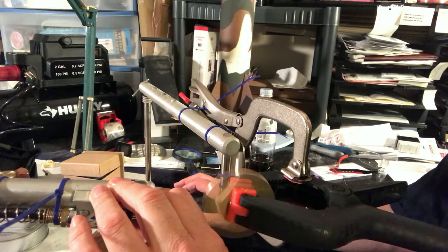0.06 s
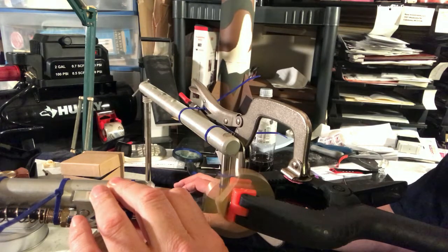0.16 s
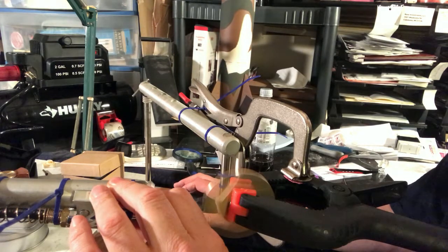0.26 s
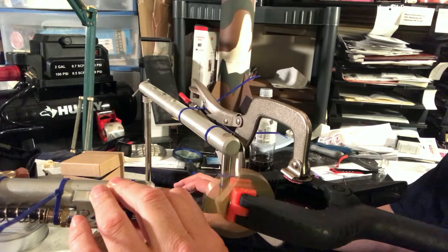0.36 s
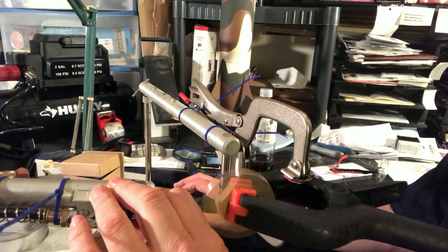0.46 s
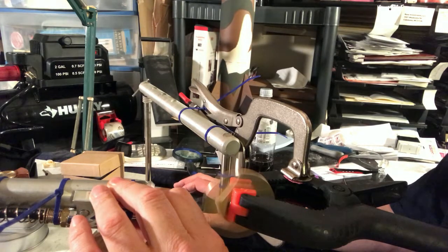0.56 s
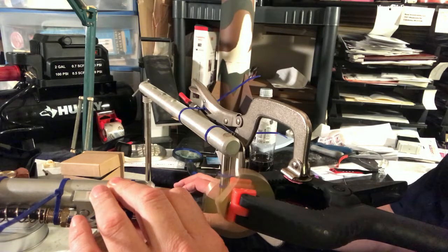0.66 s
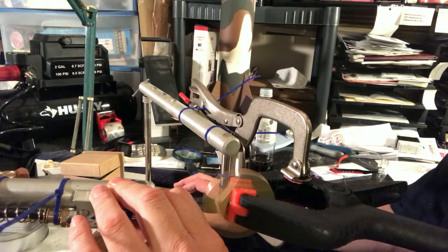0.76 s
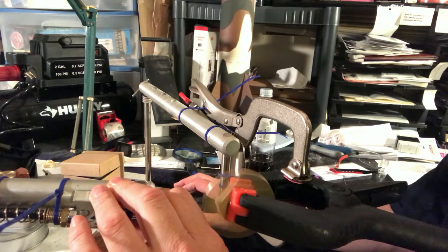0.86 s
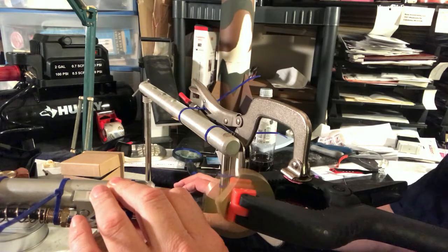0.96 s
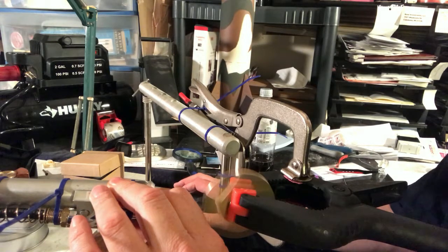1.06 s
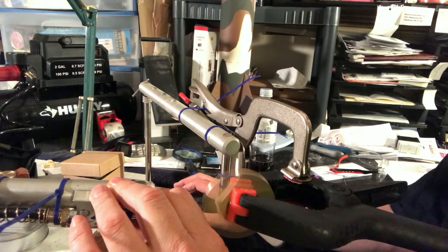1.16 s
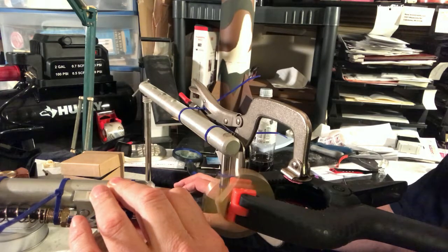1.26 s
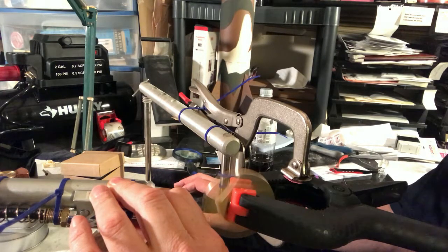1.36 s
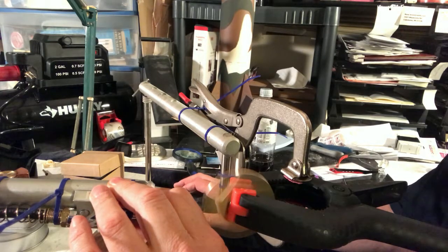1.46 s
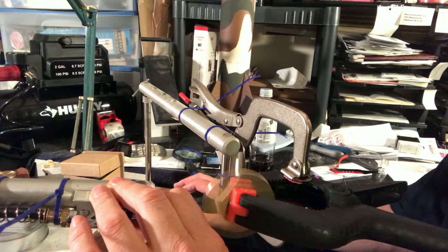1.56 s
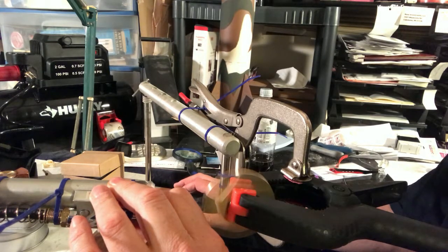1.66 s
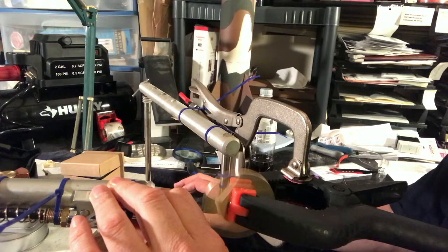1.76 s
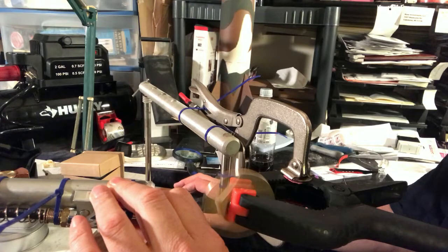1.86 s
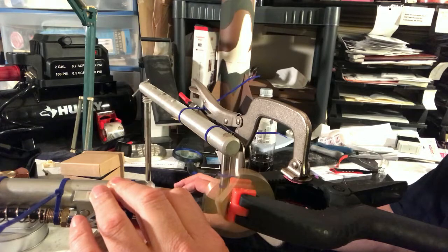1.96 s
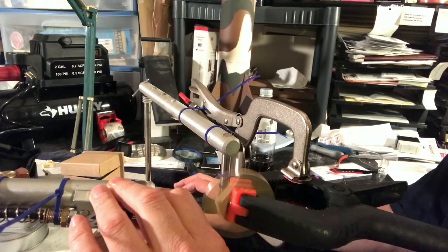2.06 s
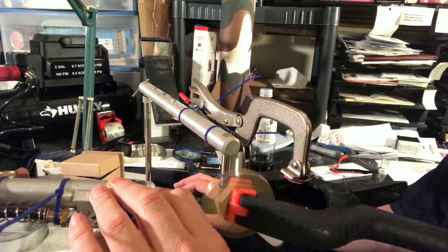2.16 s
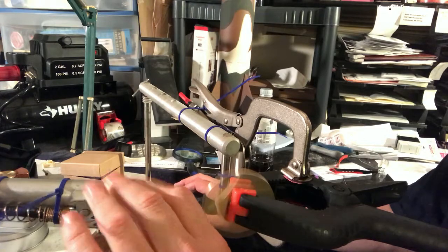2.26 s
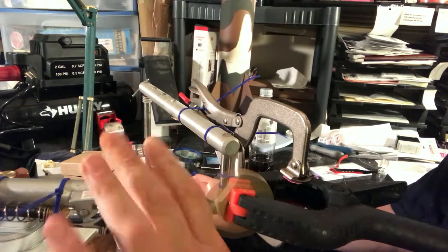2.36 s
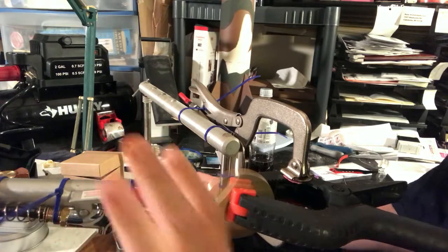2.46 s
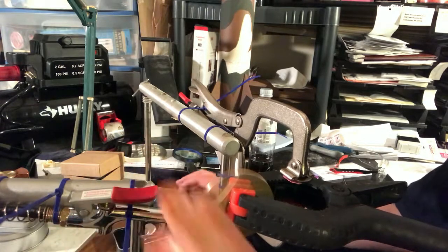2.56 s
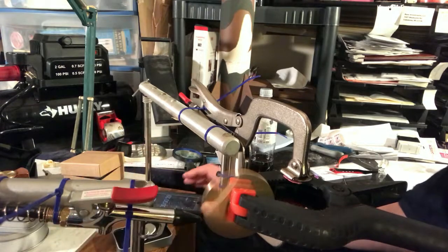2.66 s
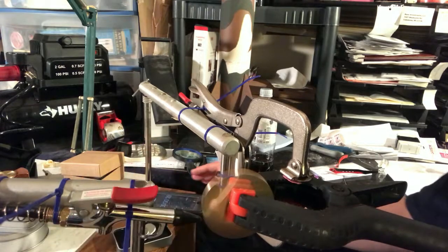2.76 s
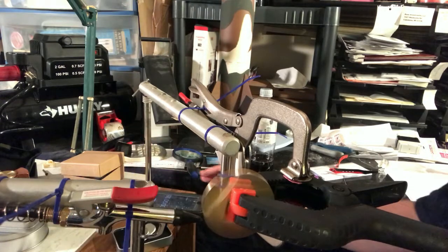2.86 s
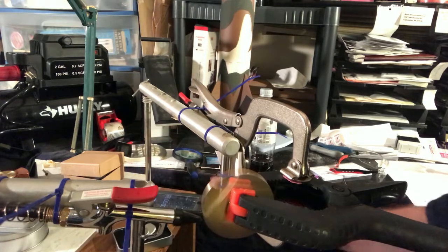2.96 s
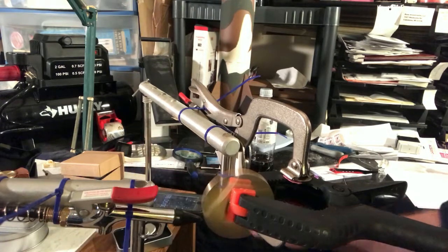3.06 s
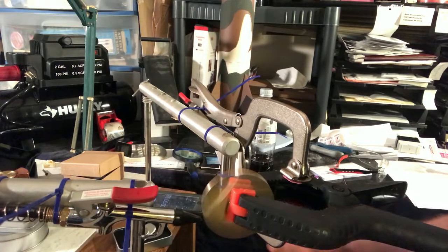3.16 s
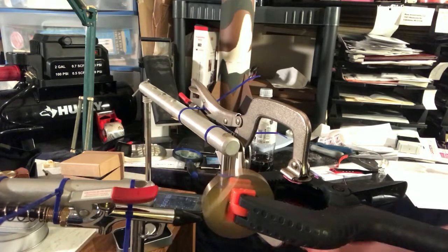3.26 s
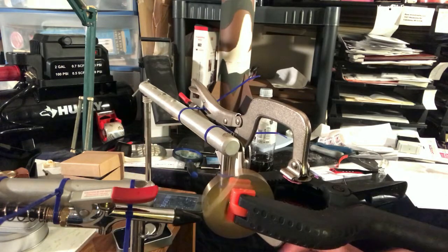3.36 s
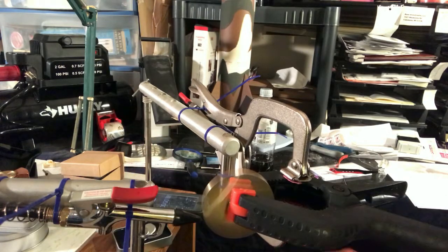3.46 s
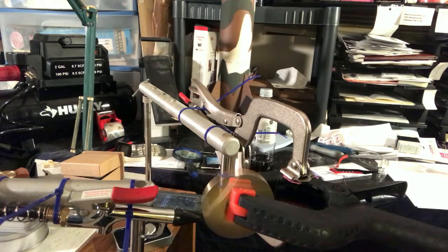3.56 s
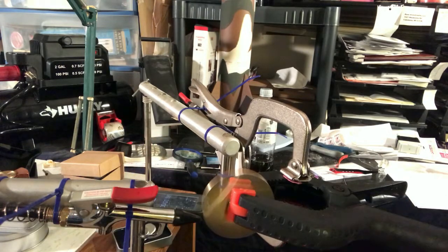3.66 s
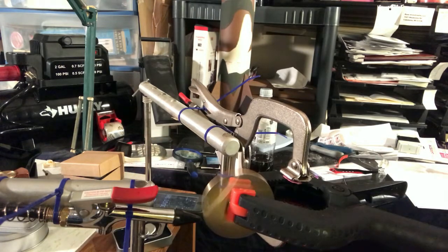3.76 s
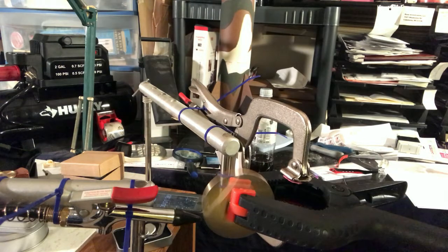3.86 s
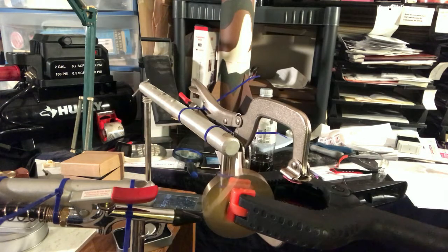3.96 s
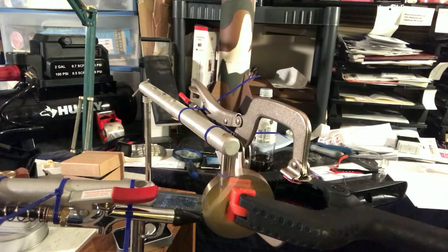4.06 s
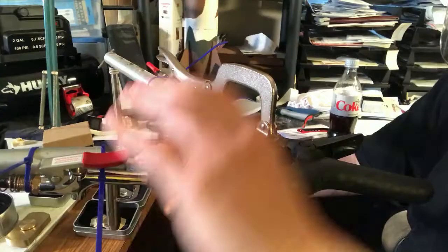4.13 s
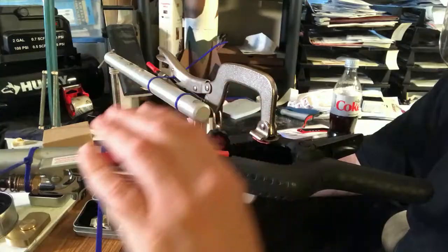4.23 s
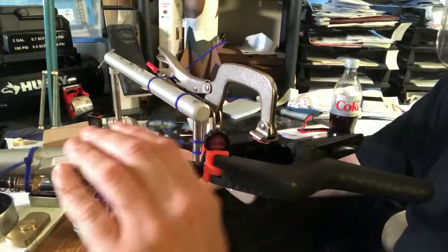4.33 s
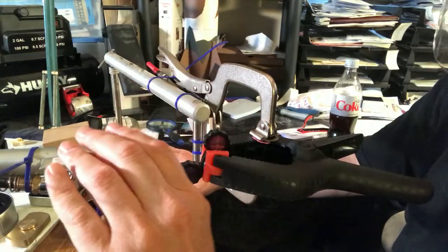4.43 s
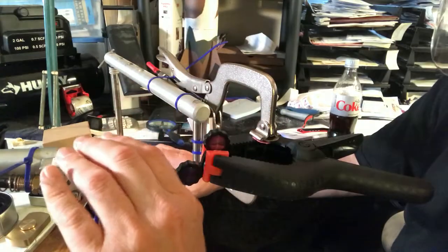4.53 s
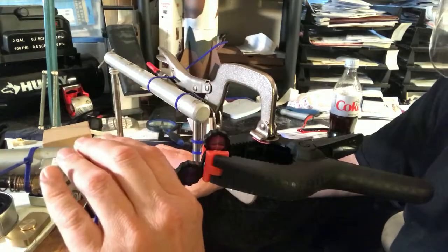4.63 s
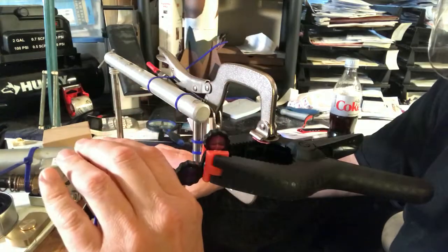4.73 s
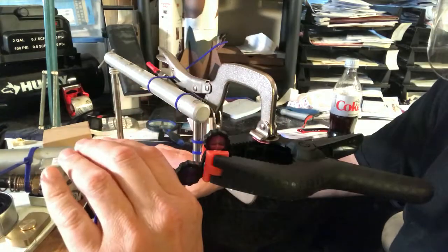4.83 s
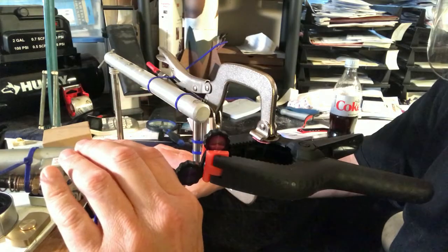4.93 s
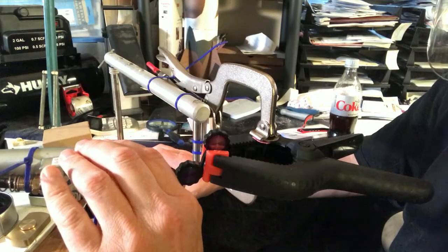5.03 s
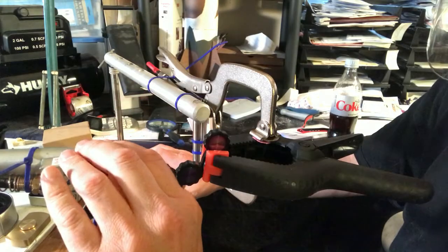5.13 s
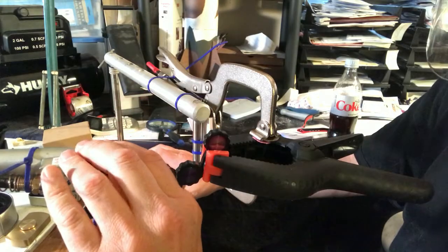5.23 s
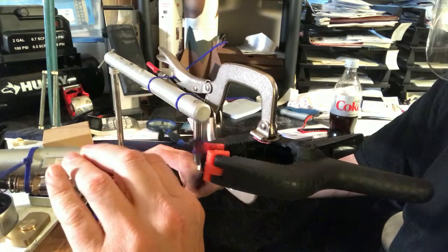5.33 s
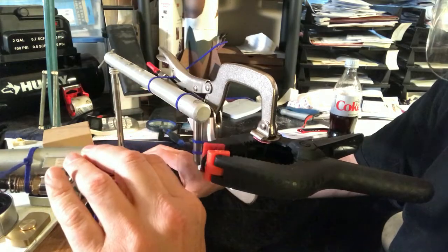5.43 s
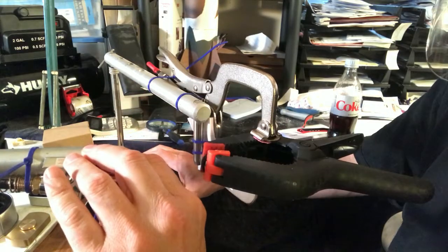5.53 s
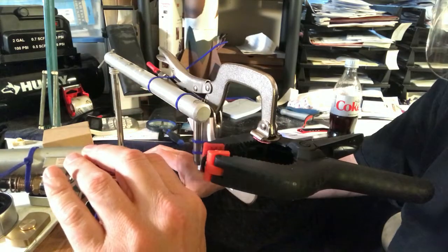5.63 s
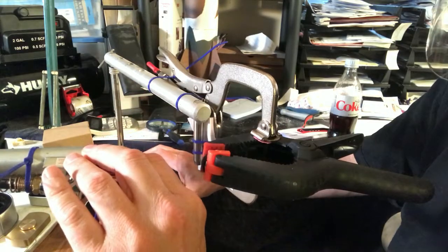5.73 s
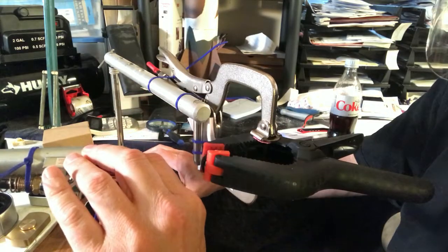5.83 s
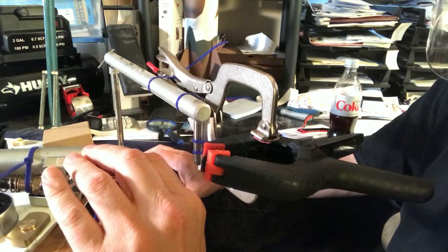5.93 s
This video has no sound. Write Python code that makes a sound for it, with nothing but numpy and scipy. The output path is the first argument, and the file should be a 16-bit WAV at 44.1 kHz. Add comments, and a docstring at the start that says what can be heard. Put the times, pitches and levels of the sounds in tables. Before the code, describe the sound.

From the start, a blow gun hisses loudly and steadily onto a small brass spinner, close to the microphone in a workshop. The spinner chops the jet into a buzz that rises slowly in pitch. At about 2.4 seconds the air shuts off sharply and the spinner coasts much more quietly, with a fast metallic rattle from its loose bearing and a low hum that gradually grows. From about 2.8 seconds a faint, very high squeal comes and goes, along with a few sharper ticks. At about 4.2 seconds the coasting cuts off abruptly, leaving only very faint room noise and hum. At about 5.4 seconds the jet bursts on again, slightly louder, with a few short low thuds of air hitting the microphone. The hiss flutters faster and faster as the spinner starts turning from rest, continuing to the end at around 6 seconds.

```python
"""Blow gun and brass spinner.

Close by on a workshop bench, in mono, a small rotor chops an air jet into a rising buzz.
The air stops and the rotor coasts, rattling, humming and squealing in its loose bearing.
After an abrupt break it stands still in the quiet room, until the jet starts it again from rest."""
import sys
import numpy as np
from scipy import signal
from scipy.fft import rfft, irfft, next_fast_len
from scipy.io import wavfile

SR = 44100
rng = np.random.default_rng(int(sys.argv[2]) if len(sys.argv) > 2 else 0)


def transcribe(signal):
    """Save signal, clipped to [-1, 1], as a 16-bit WAV file at the path in sys.argv[1]."""
    frames = np.atleast_2d(signal).T
    limited = np.clip(frames, -1, 1)
    pcm = np.round(limited * 32767).astype(np.int16)
    wavfile.write(sys.argv[1], SR, pcm)


N = 264140
TIME = np.arange(N) / SR
SIZE = next_fast_len(N, real=True)
FREQS = np.maximum(np.arange(SIZE // 2 + 1) * SR / SIZE, 1)
CUTOFF_HZ = 15780
AIR_OFF_S, BREAK_START_S, BREAK_END_S, RESTART_S = 2.372, 4.15, 4.198, 5.3605


def db_gain(db):
    """Decibels to gain."""
    return 10 ** (np.asarray(db) / 20)


def unit_power(x):
    """Scale to an RMS of 1."""
    return x / np.sqrt(np.mean(x ** 2) + 1e-20)


def time_since(start_s):
    """Seconds since a moment, zero before it."""
    return np.maximum(TIME - start_s, 0)


def apply_response(x, response):
    """Filter by a frequency response."""
    return irfft(rfft(x, SIZE) * response, SIZE)[:N]


def peaks_db(peaks):
    """Bell-shaped peaks and dips over frequency."""
    return sum(db * np.exp(-np.minimum(((FREQS - hz) / width) ** 2, 20)) for hz, width, db in peaks)


def gain_curve(spectrum, peaks=()):
    """Gain over frequency: a smooth spectrum plus resonances."""
    hz, db = np.transpose(spectrum)
    return db_gain(np.interp(np.log(FREQS), np.log(hz), db) + peaks_db(peaks)) * (FREQS < CUTOFF_HZ)


def ringing_response(gain):
    """Minimum-phase response with these gains: starts abruptly, rings out."""
    cepstrum = irfft(np.log(np.maximum(gain, 1e-4 * gain.max())))
    half = len(cepstrum) // 2
    return np.exp(rfft(np.r_[cepstrum[0], 2 * cepstrum[1:half]], 2 * half))


def curve_noise(gain, above_hz=0):
    """Coloured noise with unit power above a frequency."""
    rms = np.sqrt(np.mean((gain * (FREQS > above_hz)) ** 2))
    return apply_response(rng.standard_normal(N), gain) / rms


def slow_sway(rate_hz, hop=16):
    """Slow random wander, unit RMS."""
    size = next_fast_len(N // hop + 2, real=True)
    hz = np.arange(size // 2 + 1) * SR / hop / size
    slow = irfft(rfft(rng.standard_normal(size)) / (1 + (hz / rate_hz) ** 2), size)
    return np.interp(np.arange(N) / hop, np.arange(size), unit_power(slow))


def hit_envelope(start_s, decay_s, rise_s=.0004):
    """Fast rise, exponential decay."""
    age = time_since(start_s)
    return (1 - np.exp(-age / rise_s)) * np.exp(-np.minimum(age / decay_s, 50))


def spell_envelope(rows, floor_db, edge_s):
    """One swell, hold and fade per row, over a floor."""
    gain = db_gain(floor_db)
    for start, length, db in rows:
        inside_s = np.minimum(TIME - start, start + length - TIME)
        gain = np.maximum(gain, db_gain(db) * np.clip(.5 + inside_s / edge_s, 0, 1))
    return gain


# Room air: f/Hz, relative density/dB
ROOM_SPECTRUM = [(25, -14), (60, -7), (130, -4.5), (200, -2.5), (330, -8.5), (480, -18), (900, -16),
                 (1500, -19.5), (2400, -25.5), (4000, -28.5), (4900, -31.5), (6500, -29.5), (10400, -37.5),
                 (15700, -36.5)]
# Room hum: f/Hz, level/dB
ROOM_HUM = [(118.4, -77.5), (178.5, -72), (226, -80), (360.7, -79)]
# Whine swells: t/s, length/s, level/dB
WHINE_SPELLS = [(4.4, .45, -75.5), (5.12, .3, -77)]

def workshop(air_db=-64.5, whine_hz=1739, waver_rad=.6):
    """Quiet room air, a low hum and a faint whine that swells twice."""
    hum = sum(db_gain(db) * np.sin(2 * np.pi * hz * TIME + waver_rad * slow_sway(3.5))
              for hz, db in ROOM_HUM)
    whine = np.sin(2 * np.pi * whine_hz * TIME + waver_rad * slow_sway(8))
    whine *= spell_envelope(WHINE_SPELLS, floor_db=-86, edge_s=.12)
    return db_gain(air_db) * curve_noise(gain_curve(ROOM_SPECTRUM)) + np.sqrt(2) * (hum + whine)


# Air buffets: t/s, level/dB, decay/s, top f/Hz
BUFFETS = [(5.427, -14, 0.0067, 744), (5.438, -10.5, 0.0039, 480), (5.446, -28, 0.0067, 150),
           (5.627, -26, 0.024, 110), (5.664, -22, 0.0091, 497), (5.699, -20, 0.02, 120),
           (5.711, -21, 0.014, 260), (5.819, -24, 0.0075, 150)]

def air_buffets(low_hz=32):
    """Stray turbulent air hits the microphone in short low thuds."""
    air = rng.standard_normal(N)
    thuds = np.zeros(N)
    for start, db, decay, top_hz in BUFFETS:
        band = signal.butter(2, [low_hz, top_hz], "band", fs=SR, output="sos")
        thuds += db_gain(db) * hit_envelope(start, decay) * unit_power(signal.sosfilt(band, air))
    return thuds


# Squeal partials and sidebands: f/Hz, relative level/dB
SQUEAL_PARTIALS = [(7574, -4), (7768, -4.5), (7952, -13.5), (12890, -17), (13254, -18.5), (15010, -21),
                   (15197, -21), (15380, -22), (15570, -22)]
# Squeal spells: t/s, length/s, level/dB
SQUEAL_SPELLS = [(2.81, 0.23, -55.5), (3.14, .26, -56), (3.43, .05, -58), (3.505, 0.14, -55),
                 (3.84, 0.059, -53), (3.965, .185, -54)]

def bearing_squeal(waver_rad=.68, waver_at_hz=7800, sputter_db=3.5):
    """The dry bearing slips unsteadily; higher partials waver most."""
    waver = waver_rad * slow_sway(35)
    squeal = np.zeros(N)
    for hz, db in SQUEAL_PARTIALS:
        phase = 2 * np.pi * hz * TIME + waver * hz / waver_at_hz
        squeal += db_gain(db + sputter_db * slow_sway(38)) * np.sin(phase)
    return np.sqrt(2) * spell_envelope(SQUEAL_SPELLS, floor_db=-64, edge_s=.02) * squeal


def whirl_build_up(full_db, rise_db, tau_s, delay_s=.095):
    """Gain that grows as the axle starts to whirl, just after the air stops."""
    return db_gain(full_db - rise_db * np.exp(-time_since(AIR_OFF_S + delay_s) / tau_s))


# Unbalance hum: multiple of turn rate, relative level/dB
UNBALANCE_HARMONICS = [(1, 3), (2, -34), (3, -14)]
# Fanned air: multiple of turn rate, level/dB
FAN_HARMONICS = [(2, -59.5), (3, -58), (6, -58)]

def rotor_hum(turns):
    """The unbalanced rotor hums and fans the air as it freewheels."""
    hum, fan = (sum(db_gain(db) * np.sin(2 * np.pi * k * turns) for k, db in table)
                for table in (UNBALANCE_HARMONICS, FAN_HARMONICS))
    return np.sqrt(2) * (whirl_build_up(full_db=-36.5, rise_db=32, tau_s=1.46) * hum + fan)


# Contact force over one whirl: angle/turns (0-2), relative level/dB
WHIRL_FORCE = [(0, -6), (.2, -1.5), (.36, 11), (.56, 4), (.8, -2), (1.1, -7.5), (1.26, -2), (1.5, 3.5),
               (1.8, -7)]
# Hardest axle knocks: t/s, relative level/dB
HARD_KNOCKS = [(2.78, -14.5), (2.867, -14.5), (3.4077, -22), (3.599, -13), (3.8701, -26), (4.12, -16)]
# Holder response: f/Hz, relative level/dB
HOLDER_SPECTRUM = [(30, -16), (100, -2.5), (250, -2), (900, -6), (1500, -1.5), (2000, 2), (3600, 0),
                   (4400, -2.5), (4850, -16.5), (6500, -17), (8300, -23), (11000, -27.5), (12400, -29.5),
                   (15700, -27)]
# Holder resonances and dips: f/Hz, width/Hz, gain/dB
HOLDER_RESONANCES = [(587, 27, 10), (675, 64, 12), (863, 24, 10.5), (1090, 19, -12), (1110, 29, 8),
                     (1990, 53, 4.5), (2670, 19, 8), (2930, 47, 1), (3170, 41, -5), (3440, 43, 4.5),
                     (3510, 37, 3.5), (3720, 61, 6), (3900, 140, -3), (5470, 320, 9), (13100, 320, 16),
                     (15200, 400, 6)]

def axle_rattle(turns, knock_db=-1.5, hard_db=-5, scrape_db=-4, uneven_db=2.14, jitter_turns=.039):
    """The axle whirls in its bearing at half speed; its knocks and scraping ring the holder."""
    level = whirl_build_up(full_db=-34.4, rise_db=7.1, tau_s=.19) * db_gain(.5 * slow_sway(3))
    angle = turns + 1 / 4
    turn = angle.astype(int)
    per_turn = rng.uniform(-1, 1, (turn.max() + 1, 2)) * np.sqrt(3)
    strength, timing = per_turn[turn].T
    contact_db = np.interp(angle + jitter_turns * timing, *np.transpose(WHIRL_FORCE), period=2)
    whirl_force = level * db_gain(knock_db + contact_db + uneven_db * strength)
    hard_force = sum(db_gain(db + hard_db) * hit_envelope(t, decay_s=.0023) for t, db in HARD_KNOCKS)
    # Knocks fill the midrange; scraping supplies bass and top treble.
    knock_band = 1 / (1 + 1200 / (1j * FREQS)) / (1 + (FREQS / 8000) ** 4)
    scrape_band = 1 / (1 + 1j * FREQS / 14000)
    knocks = apply_response(np.maximum(whirl_force, hard_force) * rng.standard_normal(N), knock_band)
    scrape = apply_response(level * db_gain(scrape_db) * rng.standard_normal(N), scrape_band)
    holder = ringing_response(unit_power(gain_curve(HOLDER_SPECTRUM, HOLDER_RESONANCES)))
    return apply_response(knocks + scrape, holder)


def trigger_valve(shut_s=.0036, open_s=.0032, lag_s=.013, tail_db=-11, tail_t60_s=.18):
    """Jet gain: the valve shuts, the sound dies away in the room, the valve reopens."""
    off_s = time_since(AIR_OFF_S)
    closing = np.maximum(np.exp(-off_s / shut_s), db_gain(tail_db - 60 * off_s / tail_t60_s))
    opening = 1 / (1 + np.exp(np.minimum((RESTART_S + lag_s - TIME) / open_s, 50)))
    return closing + opening


def hose_surge_db(peak_db=7, delay_s=.048, rise_s=.012, fall_s=.04):
    """Extra hiss as the hose unloads its stored air at the restart."""
    age = TIME - RESTART_S - delay_s
    return peak_db * np.exp(-np.abs(age) / np.where(age < 0, rise_s, fall_s))


# Jet on the fast rotor: f/Hz, relative density/dB
FAST_JET_SPECTRUM = [(25, -19), (90, -13), (250, -2.5), (700, -2.5), (1600, 0.5), (3000, -1.5), (7500, 0),
                     (9000, 0), (10400, 1), (12000, -1), (14000, 1.5), (15700, 2)]
# Jet on the slow rotor: f/Hz, relative density/dB
SLOW_JET_SPECTRUM = [(25, -4), (55, 3), (100, -1.5), (350, -7), (1000, 0), (2000, 1.5), (3200, 1),
                     (7500, 1), (9000, -1.5), (10400, 5), (11500, 3), (13500, 2.5), (15700, 3.5)]
# Cavities round the rotor: f/Hz, width/Hz, fast-rotor gain/dB, slow-rotor gain/dB
ROTOR_CAVITIES = [(2350, 190, -1.5, -2.5), (3200, 130, 1.5, 2), (4336, 170, 3.5, 8), (5030, 140, -1, 2.5),
                  (5450, 170, 3, 7.5), (6310, 630, 3, 3), (7250, 270, -0.5, -1.5), (8250, 130, 1.5, 0.5),
                  (9050, 220, 1, 4), (10450, 560, -6, -7), (15150, 160, 1, -4)]
# Rotor shielding the nozzle: angle/turns (0-1), level/dB at depth 1
NOZZLE_CHOP = [(0, -0.5), (.1, -4.5), (.23, -5), (.38, 0), (.55, -1.8), (.8, 3)]

def jet_hiss(turns, first_run, first_db=-22, restart_db=-18.5, sag_db_per_s=.75):
    """Jet noise, coloured by cavities, chopped each turn and sinking as the pressure sags."""
    chop_db = np.interp(turns, *np.transpose(NOZZLE_CHOP), period=1)

    def chopped_jet(spectrum, cavities, blow_db, chop_depth, flutter_db):
        level_db = blow_db + chop_depth * chop_db + flutter_db * slow_sway(69)
        return db_gain(level_db) * curve_noise(gain_curve(spectrum, cavities), above_hz=6500)

    fast_cavities = [(hz, width, db) for hz, width, db, _ in ROTOR_CAVITIES]
    slow_cavities = [(hz, width, db) for hz, width, _, db in ROTOR_CAVITIES]
    fast_db = first_db - sag_db_per_s * TIME
    slow_db = restart_db - sag_db_per_s * time_since(RESTART_S) + hose_surge_db()
    fast = chopped_jet(FAST_JET_SPECTRUM, fast_cavities, fast_db, chop_depth=.45, flutter_db=0)
    slow = chopped_jet(SLOW_JET_SPECTRUM, slow_cavities, slow_db, chop_depth=1.07, flutter_db=1.04)
    return np.where(first_run, fast, slow)


def puff_train(harmonics, turns, lag_turns=.2985, lag_harmonics=14, size=512):
    """The pressure pulse that the rotor cuts from the jet, once per turn."""
    multiple, db = np.transpose(harmonics)
    k = np.arange(size // 2 + 1)
    gain = db_gain(np.interp(k, multiple, db - db.max(), left=-20, right=-60))
    spectrum = ringing_response(np.maximum(gain, db_gain(-26.5)))
    # Low harmonics lag, so each puff chirps downward.
    chirp = np.exp(-2j * np.pi * lag_turns * lag_harmonics * (1 - np.exp(-k / lag_harmonics)))
    pulse = unit_power(irfft(spectrum * chirp * (k > 0) * (k <= multiple.max())))
    return np.interp(turns % 1 * size, np.arange(size), pulse)


def echo_shimmer(x, depth=.2, rate_hz=3, above_hz=1500):
    """Short echoes of wandering strength swell and fade the upper overtones."""
    treble = apply_response(x, 1 / (1 + (above_hz / FREQS) ** 4))
    lags_s = np.geomspace(.0007, .0031, 3)
    return x + depth * sum(slow_sway(rate_hz) * np.interp(TIME - lag, TIME, treble) for lag in lags_s)


# Puff at low speed: multiple of turn rate, relative level/dB
SLOW_HARMONICS = [(1, 5), (2, -3), (5, -12.5), (8, -1), (12, 5.5), (15, -7), (20, -1), (30, -30)]
# Puff at medium speed: multiple of turn rate, relative level/dB
MID_HARMONICS = [(1, -9.5), (2, -3), (3, -12.5), (4, -15.5), (5, -3.5), (6, -2.5), (7, -8.5), (8, 0),
                 (9, -2.5), (10, -7.5), (11, -2.5), (12, -2), (13, -8.5), (14, -10.5), (15, -8),
                 (16, -18.5), (17, -9), (18, -11), (19, -14.5), (20, -6), (21, -10.5), (22, -20), (23, -14),
                 (24, -16.5), (25, -20), (26, -8), (27, -11.5), (28, -14)]
# Puff at high speed: multiple of turn rate, relative level/dB
FAST_HARMONICS = [(1, -9), (2, 2.5), (3, -0.5), (4, -8.5), (5, 3.5), (6, 0.5), (7, -4.5), (8, 2.5),
                  (9, 1.5), (10, -6.5), (11, -2.5), (12, -5), (13, -13), (14, -4.5), (15, -4.5), (16, -15),
                  (17, -5), (18, -3.5), (19, -15), (20, -21), (21, -12), (22, -12.5), (23, 0.5), (24, -7.5),
                  (25, -17), (26, -22.5), (27, -27.5), (28, -19), (29, -8.5), (30, -21)]
# Bench resonances and cancellations: f/Hz, width/Hz, gain/dB
BENCH_RESONANCES = [(326, 22, 3), (476.3, 25, 8.5), (657, 35, 7.5), (693, 42, -14.5), (816, 20, -0.5),
                    (1290, 17, 0), (1335, 16, -1.5), (1798, 45, -3.5), (1895, 25, 5), (2424, 35, -0.5),
                    (2930, 55, -4), (3220, 36, 4.5), (3540, 30, 5), (4040, 160, -4), (4285, 52, -6),
                    (4900, 61, -1), (5450, 120, 2)]

def rotor_buzz(speed_hz, turns, base_db=-20.5, base_hz=175, db_per_octave=8,
               lead_turns=.1, wobble_turns=.0011, flutter_db=.75):
    """Puffs grow and change shape with speed; turbulence shakes their timing and strength."""
    angle = turns + lead_turns + wobble_turns * slow_sway(60)
    blend_hz = [120, 152, 163, 183]
    blends = ((SLOW_HARMONICS, [1, 0, 0, 0]), (MID_HARMONICS, [0, 1, 1, 0]),
              (FAST_HARMONICS, [0, 0, 0, 1]))
    puffs = sum(np.interp(speed_hz, blend_hz, shares) * puff_train(harmonics, angle)
                for harmonics, shares in blends)
    octaves = np.log2(np.maximum(speed_hz, 1) / base_hz)
    level_db = base_db + db_per_octave * octaves + flutter_db * slow_sway(20)
    bench = ringing_response(db_gain(peaks_db(BENCH_RESONANCES)))
    return apply_response(echo_shimmer(puffs) * db_gain(level_db), bench)


def rotor_motion(first_run, start_hz=151.8, limit_hz=258.7, tau_s=5.6,
                 friction_hz_per_s=3.7, restart_hz_per_s=189.5):
    """Speed and angle: jet spin-up, coasting against friction, then an even run-up from rest."""
    driven_hz = limit_hz - (limit_hz - start_hz) * np.exp(-np.minimum(TIME, AIR_OFF_S) / tau_s)
    first_hz = driven_hz - friction_hz_per_s * time_since(AIR_OFF_S)
    restart_hz = restart_hz_per_s * time_since(RESTART_S)
    speed_hz = np.where(first_run, first_hz, restart_hz)
    turns = np.where(first_run, np.cumsum(first_hz), np.cumsum(restart_hz)) / SR
    return speed_hz, turns


def scene():
    """Drive, coast, break, rest and restart on two identical channels."""
    first_run = TIME < BREAK_START_S
    speed_hz, turns = rotor_motion(first_run)
    valve = trigger_valve()
    air = valve * (jet_hiss(turns, first_run) + rotor_buzz(speed_hz, turns))
    # The jet presses the axle aside; it rattles only with the air off.
    coasting = first_run * np.clip(1 - valve, 0, 1)
    bearing = coasting * (axle_rattle(turns) + rotor_hum(turns) + bearing_squeal())
    audible = first_run | (TIME > BREAK_END_S)
    return np.tile(audible * (air + bearing + air_buffets() + workshop()), (2, 1))


def record(dry, low_hz=32, ceiling=.7):
    """Microphone: bass cut, soft peak limiting, steep treble cut."""
    highpass = signal.butter(4, low_hz, "high", fs=SR, output="sos")
    lowpass = signal.ellip(12, .1, 90, CUTOFF_HZ, fs=SR, output="sos")
    heard = signal.sosfilt(highpass, dry)
    rounded = heard / (1 + (heard / ceiling) ** 4) ** (1 / 4)
    return signal.sosfilt(lowpass, rounded)


dry = scene()
out = record(dry)
transcribe(out)
```